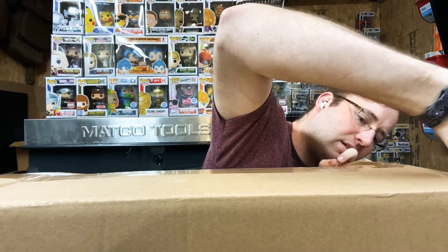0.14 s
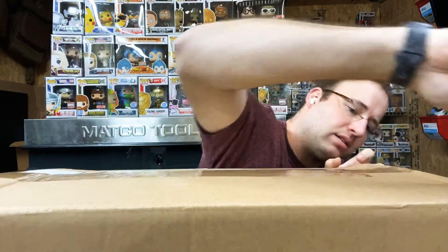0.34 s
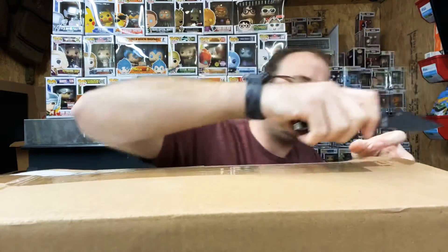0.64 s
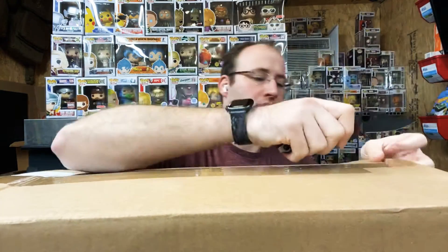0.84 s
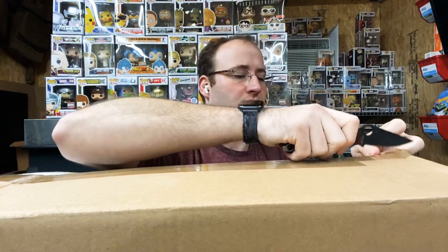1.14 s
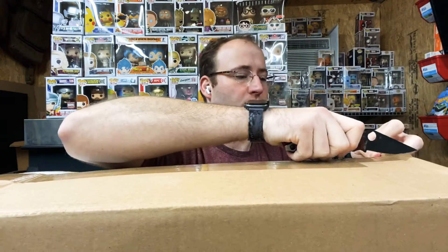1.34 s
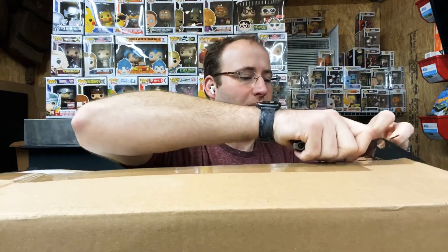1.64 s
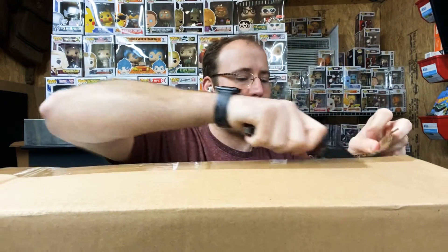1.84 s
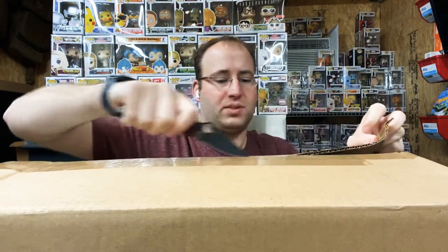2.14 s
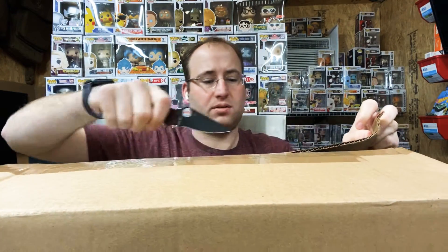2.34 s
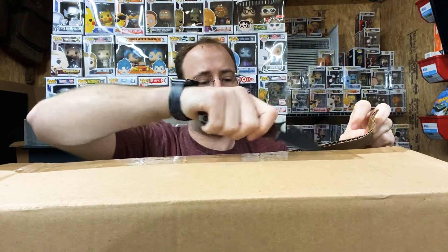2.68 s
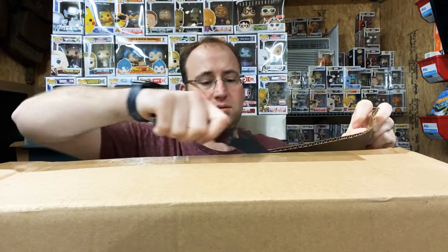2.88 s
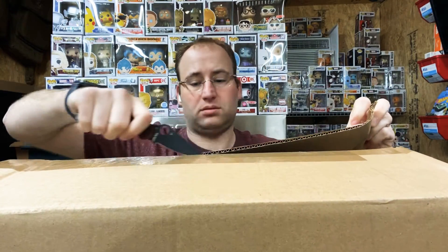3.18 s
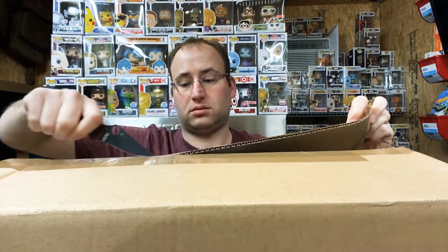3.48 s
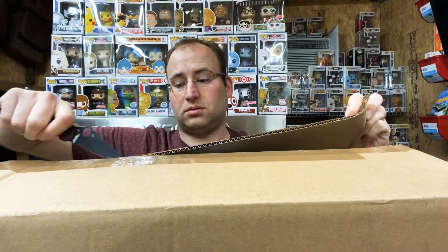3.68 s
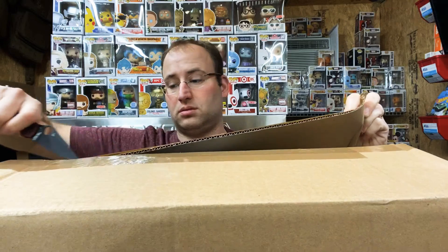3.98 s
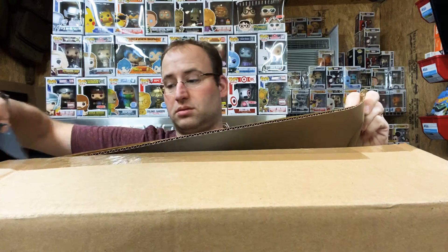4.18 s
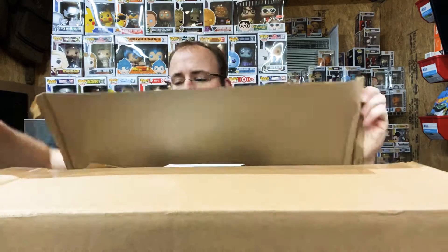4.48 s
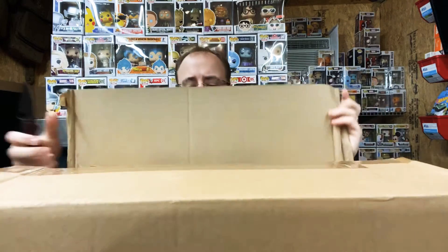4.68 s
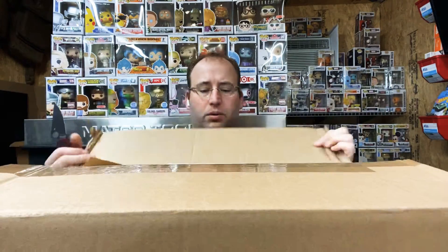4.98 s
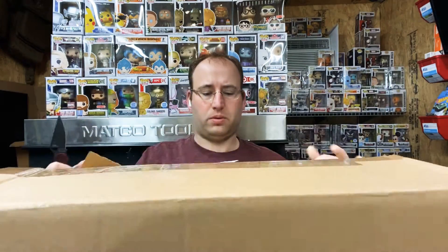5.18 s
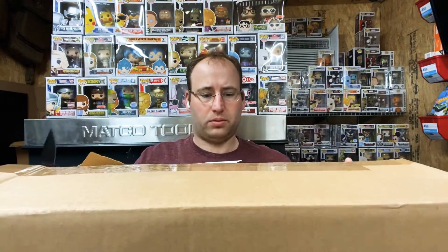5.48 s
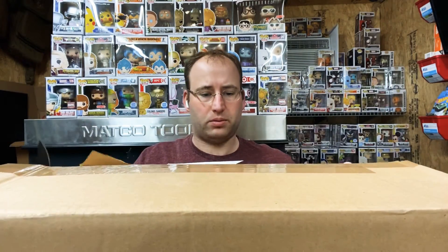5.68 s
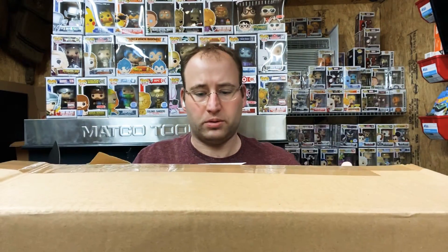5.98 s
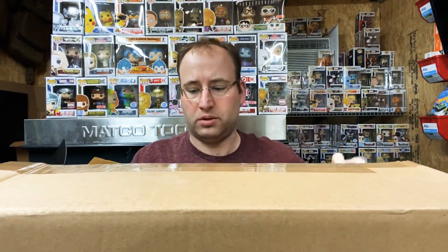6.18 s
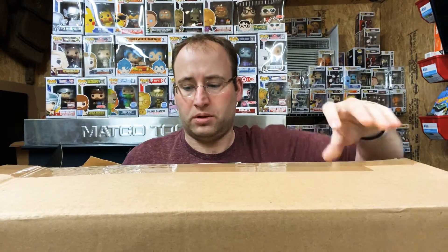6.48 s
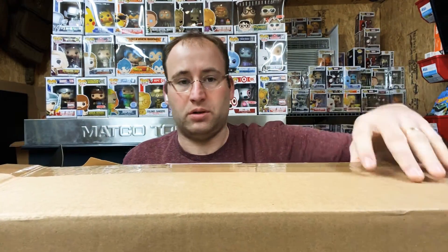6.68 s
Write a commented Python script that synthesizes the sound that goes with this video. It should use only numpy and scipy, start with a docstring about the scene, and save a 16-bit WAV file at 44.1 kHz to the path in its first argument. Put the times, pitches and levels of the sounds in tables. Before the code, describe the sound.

A taped cardboard box is cut open in a quiet room with a short echo. Early snaps and faint rubbing lead to one explosive tape pop, followed by gritty blade strokes with low boxy resonance, a stuttering catch and scattered fibre snaps. The last tape tears abruptly; afterwards come flap scuffs, tiny squeaks, soft bumps and sliding hands, captured close up.

```python
"""Cutting open a taped box

A knife opens a taped cardboard box close to the microphone, in a small cluttered room.
Tape pops and snaps are noise bursts, and the blade's strokes are grains of tiny fractures in three bands.
The blade also judders, and the last tape rips in a steep swell. Bumps and knocks ring the box panel.
A flap folds back with rubbing noise and rising squeaks; hands slide over the cardboard.
A short room echo and quiet air lie around it all."""
import sys
import numpy as np
from scipy import signal
from scipy.fft import rfft, irfft, next_fast_len
from scipy.io import wavfile
from scipy.ndimage import uniform_filter1d, map_coordinates

SR = 44100
rng = np.random.default_rng(int(sys.argv[2]) if len(sys.argv) > 2 else 0)


def transcribe(u):
    """Save the signal u as a 16-bit wav file named by the first command-line argument.

    u: samples, shape (n,) or (channels, n), limited to [-1, 1]; the rate is SR.
    q: integer samples, one column per channel.
    """
    v = np.clip(np.atleast_2d(u).T, -1, 1)
    q = np.round(v * 32767).astype(np.int16)
    wavfile.write(sys.argv[1], SR, q)


N = 301070
T = np.arange(N) / SR  # time in seconds
SHORT = T[:SR // 4]  # time within one hit

# Three strokes of the blade along the seam, one list of rows each, before the band gains below.
# Each row: time in seconds, hiss level in dB, rasp level in dB, box drone level in dB.
BLADE_STROKES = [
    [(1.7, -56, -79, -58), (1.716, -43.5, -48, -41.5), (1.754, -44, -65, -44.5), (1.828, -51, -70, -59.5),
     (1.946, -41.5, -49.5, -71), (2.038, -45, -63.5, -56.5), (2.068, -54.5, -61, -61),
     (2.085, -72, -76, -51)],
    [(2.67, -53, -78, -95), (2.69, -50, -74, -50.5), (2.716, -55, -60.5, -58.5), (2.804, -46, -51.5, -45.5),
     (2.942, -56, -54.5, -76), (3.21, -49, -53, -70), (3.342, -56, -68.5, -83.5), (3.5, -49, -70, -71),
     (3.53, -57, -75, -53)],
    [(3.55, -62, -64, -73), (3.562, -53.5, -54, -69), (3.698, -54.5, -72, -73), (3.75, -51, -53.5, -76),
     (3.78, -57, -71, -68), (3.87, -50.5, -50.5, -58), (4.02, -48.5, -47.5, -46), (4.162, -49, -44, -46.5),
     (4.235, -36.5, -35, -45.5)],
]
# Tape and fibres snapping. Each row: start in seconds, strength in dB.
FIBRE_SNAPS = [(0.0786, -17.5), (0.087, -20.5), (0.819, -33), (0.9869, -41.5), (1.713, -26), (2.276, -49),
               (3.047, -36.5), (3.4228, -33.5), (3.502, -35), (3.652, -36.5), (3.701, -37), (3.822, -35),
               (3.951, -27), (4.009, -23), (4.031, -22.5), (4.1848, -25), (4.7503, -31), (5.5652, -32),
               (6.228, -35), (6.739, -35.5)]
# The taut tape bursting. Each row: start in seconds, strength in dB, time to fade by 60 dB in seconds.
TAPE_POPS = [(1.478, -37.5, 0.02), (1.4861, -4.5, 0.045), (1.493, -12.5, 0.035), (4.2585, -21.5, 0.015)]
# Knocks on the hollow box. Each row: start in seconds, peak of the thump in dB, pitch of the panel in Hz.
BOX_KNOCKS = [(0.086, -24, 394), (0.092, -29, 207), (1.486, -13.5, 195.3), (1.596, -30, 215),
              (2.609, -47.5, 219), (3.518, -45, 198), (3.566, -36.5, 213), (3.822, -41, 198),
              (3.955, -31.5, 213), (4.010, -25, 195), (4.256, -18, 214.6), (4.696, -48, 208.4),
              (4.888, -36.5, 186), (4.935, -43.5, 218), (5.99, -40, 272), (6.232, -40.5, 182),
              (6.357, -56.5, 199), (6.529, -48, 212), (6.737, -36.5, 232)]
# Ways a box panel can ring. Each row: multiple of its pitch, relative level in dB, time to fade by 60 dB in seconds.
PANEL_MODES = [(0.798, -5, 0.054), (0.998, 1.5, 0.067), (1.221, -1.5, 0.045), (1.6, -5.5, 0.057),
               (2.148, -17, 0.031), (3.048, -15.5, 0.043)]
# An edge catches and sets one resonance of the board going.
# Each row: middle in seconds, half length in seconds, resonance in Hz, its width in Hz, level in dB.
EDGE_SCRAPES = [(0.085, 0.0066, 744, 496, -35.5), (0.158, 0.038, 4430, 428, -51.5),
                (0.481, 0.057, 2880, 610, -50), (0.996, 0.0042, 567, 251, -55),
                (1.605, 0.0052, 476, 393, -42.5), (1.923, 0.048, 1330, 345, -59),
                (2.772, 0.039, 620, 370, -55.5), (3.568, 0.011, 2600, 1170, -46.5),
                (4.901, 0.031, 827, 407, -50), (5.299, 0.018, 1540, 1770, -41.5)]
# The flap folded back along its neighbours. Each row: time in seconds, hiss level in dB, rasp level in dB.
FLAP_FOLD = [(4.66, -74, -69), (4.762, -46.5, -54.5), (4.85, -61, -61.5), (4.882, -35, -45.5),
             (4.938, -57, -59.5), (5.066, -45, -58), (5.114, -36.5, -43), (5.17, -53.5, -51.5),
             (5.256, -54.5, -58), (5.28, -47.5, -45.5), (5.352, -54, -55.5), (5.392, -43, -54),
             (5.45, -63, -56.5), (5.48, -84, -81)]
# Hands sliding over cardboard.
# Each row: start in seconds, length in seconds, hiss level in dB, rasp in dB against the hiss.
HAND_RUBS = [(0.451, 0.074, -49.5, -1.5), (0.556, 0.33, -64.5, -3), (1.621, 0.042, -60, -9),
             (4.441, .18, -72, 1.5), (5.667, 0.065, -48, 4.5), (5.803, 0.041, -57.5, 4),
             (6.146, 0.019, -64.5, 7), (6.585, 0.042, -55, -5), (6.74, 0.061, -58.5, -1)]
# The crease of the flap squeaking as it is bent back.
# Each row: start in seconds, length in seconds, pitch at the start in Hz, level in dB.
CREASE_SQUEAKS = [(5.011, .15, 1009, -56.5), (5.244, 0.068, 1063, -53)]
# Tone of tape fibres breaking. Each row: frequency in Hz, relative level in dB per Hz.
TAPE_TONE = [(1700, -24), (2450, -15), (2950, 0), (3500, -5), (4150, -1), (4800, -6), (5600, -1), (6100, 0),
             (6800, 3), (8000, -10)]
# Tone of rubbed board. Each row: frequency in Hz, relative level in dB per Hz.
BOARD_TONE = [(400, -21.5), (680, -15.5), (1200, -24.5), (3000, -5), (3600, -5), (4500, 1.5), (5500, 2),
              (6900, 9.5), (8000, -7.5)]
# Tone of the hollow box droning. Each row: frequency in Hz, relative level in dB per Hz.
HOLLOW_TONE = [(80, -29), (140, -3.5), (200, 6.5), (450, -13), (740, -16), (1200, -28.5), (3000, -48)]
# Tone of a pop's crackle. Each row: frequency in Hz, relative level in dB per Hz.
BURST_TONE = [(70, -21.5), (200, -9.5), (620, 4), (900, 1), (1400, 2.5), (1650, -2), (2050, -2), (3200, 2),
              (4400, -4.5), (5700, -0.5), (8000, -15.5)]
# Tone of tearing, crunching and scuffing. Each row: frequency in Hz, relative level in dB per Hz.
TEAR_TONE = [(70, -16.5), (230, 4.5), (500, 8.5), (900, 4.5), (1600, -7), (2900, 3), (5000, 1.5),
             (6600, 8.5), (8000, -9)]
# Tone of the room's air. Each row: frequency in Hz, relative level in dB per Hz.
AIR_TONE = [(80, -35.5), (170, -8.5), (2100, -15), (8000, -25)]

HISS_DB, RASP_DB, DRONE_DB = 0, -1.5, 0  # gains of the three cutting bands
# the last stretch of tape tearing free: a steep crescendo, a short hold, a fall
RIP_S, RIP_HOLD_S, RIP_DB = 4.247, 0.006, -21
RIP_RISE_DB_PER_S, RIP_FALL_DB_PER_S = 898, 682.5
SNAP_T60, LONGER_PER_DB = 0.032, 0.1251  # s for a snap of -28.5 dB; harder ones spray for longer
SNAP_ATTACK_S, SCUFF_ATTACK_S = .002, 0.0036  # fibres give way over a few milliseconds
# the blade sticking and slipping in the board, with one hard slip (the jolt) along the way
JUDDER_S, JUDDER_LENGTH_S, JUDDER_DB = 2.09, .085, -33.5
JUDDER_SAG_DB_PER_S, JOLT_S, JOLT_DB = 152, 2.139, -25
SLIP_HZ, JUDDER_PANEL_HZ = 99, 205.5  # slips a second; pitch of the panel they nudge
# the scuff of a knock against its thump; its decay in seconds; its highest level
SCUFF_DB, SCUFF_T60, SCUFF_MAX_DB = -10.5, 0.087, -45.5
RUB_RISE_DB_PER_S, RUB_FALL_DB_PER_S = 450, 351
SQUEAK_RISE_HZ_PER_S, SQUEAK_WIDTH_HZ = 900, 170
ROOM_T60, ROOM_DB = 0.13, -12.5  # echo decay in seconds; echo level against the direct sound
AIR_DB = -69
TOP_HZ = 7600  # band limit of the microphone


def cutting():
    """The blade breaks tape fibre by fibre, catching unevenly; the same grain drives the box."""
    band_gains = amp([[HISS_DB], [RASP_DB], [DRONE_DB]])
    hiss, rasp, drone = sum(gains(rows) for rows in BLADE_STROKES) * band_gains
    grain = fibres(rate=1100, spread_db=5.5, smooth=.35)
    catching = unit(amp(2.12 * wobble(62)))
    blade = friction(hiss, rasp, shifting(coloured(grain, TAPE_TONE)))
    box_drone = drone * coloured(grain, HOLLOW_TONE)
    return catching * (blade + box_drone)


def rip():
    """The last of the tape tears in a dense grain of breaks that swells steeply and falls away."""
    pull = held(RIP_S, RIP_HOLD_S, RIP_RISE_DB_PER_S, RIP_FALL_DB_PER_S)
    tearing = coloured(fibres(rate=4500, spread_db=1.5, smooth=1.0), TEAR_TONE)
    return amp(RIP_DB) * pull * tearing


def snaps():
    """A snap is a tick and a short spray of breaking fibres; harder ones crunch the board more."""
    spray, crunch = np.zeros((2, N))
    for s, db in FIBRE_SNAPS:
        t60 = SNAP_T60 * np.exp(LONGER_PER_DB * (db + 28.5))
        tick_and_spray = fade(0.0091) + fade(t60)
        burst = amp(db - 6) * tick_and_spray * attack(SNAP_ATTACK_S)
        add(spray, s, burst)
        add(crunch, s, burst * amp(0.24 * db - 1.5))
    return spray * coloured(noise(), TAPE_TONE) + crunch * coloured(noise(), TEAR_TONE)


def pops():
    """Taut tape gives way: one pressure pulse, then a broad crackling decay."""
    out = np.zeros(N)
    u = SHORT / .00022  # the pulse lasts a fraction of a millisecond
    pulse = (u - 1) * np.exp(-u)
    for s, db, t60 in TAPE_POPS:
        decay = fade(t60) + .08 * fade(0.075)
        crackle = coloured(noise(len(SHORT)), BURST_TONE) * decay
        add(out, s, amp(db) * (2.4 * pulse + .62 * crackle))
    return out


def judder():
    """Each slip of the stuck blade nudges the panel; the soft board passes no treble."""
    out = np.zeros(N)
    ring = panel(JUDDER_PANEL_HZ)
    for age in np.arange(0, JUDDER_LENGTH_S, 1 / SLIP_HZ):
        slip_db = JUDDER_DB - JUDDER_SAG_DB_PER_S * age + rng.normal()
        add(out, JUDDER_S + age, amp(slip_db) * ring)
    add(out, JOLT_S, amp(JOLT_DB) * ring)
    return filtered(out, lambda hz: 1 / (1 + (hz / 400) ** 6))


def knocks():
    """Blade and hands bump the box: the panel thumps and its surface scuffs."""
    thumps, scuff = np.zeros((2, N))
    for s, db, pitch_hz in BOX_KNOCKS:
        add(thumps, s, amp(db) * panel(pitch_hz))
        scuff_db = min(db + SCUFF_DB, SCUFF_MAX_DB)
        add(scuff, s, amp(scuff_db) * fade(SCUFF_T60) * attack(SCUFF_ATTACK_S))
    return thumps + scuff * coloured(noise(), TEAR_TONE)


def panel(pitch_hz):
    """The ring of a box panel after one blow, peak 1; it is too small to radiate deep bass."""
    ring = np.zeros(len(SHORT))
    for ratio, db, t60 in PANEL_MODES:
        ring += amp(db) * fade(t60) * np.sin(2 * np.pi * ratio * pitch_hz * SHORT)
    no_bass = signal.butter(4, 138, "high", fs=SR, output="sos")
    ring = signal.sosfilt(no_bass, ring * attack(.0015))
    return ring / np.abs(ring).max()


def scrapes():
    """Short swells of friction, each ringing in one resonance."""
    out = np.zeros(N)
    for s, half, centre_hz, width_hz, db in EDGE_SCRAPES:
        def resonance(hz):
            return 1 / (1 + ((hz ** 2 - centre_hz ** 2) / (hz * width_hz + 1)) ** 2)
        swell = np.exp(-((T - s) / half) ** 2)
        out += amp(db) * unit(filtered(noise(), resonance)) * swell
    return out


def rubbing():
    """Flap and hands swell and fade, with a finer grain than the cut and a faint drone from the box."""
    hiss, rasp = gains(FLAP_FOLD)
    for s, length, db, rasp_db in HAND_RUBS:
        swell = amp(db) * held(s, length, RUB_RISE_DB_PER_S, RUB_FALL_DB_PER_S)
        hiss = hiss + swell
        rasp = rasp + swell * amp(rasp_db)
    grain = fibres(rate=2000, spread_db=4, smooth=.65)
    surface = friction(hiss, rasp, shifting(coloured(grain, BOARD_TONE)))
    return surface + amp(-31) * hiss * coloured(grain, HOLLOW_TONE)


def squeak():
    """A narrow, unsteady band of friction in the crease glides upward."""
    # slow noise times a tone makes a band of noise around the tone's pitch
    flutter = unit(filtered(noise(), lambda hz: 1 / (1 + (2 * hz / SQUEAK_WIDTH_HZ) ** 2)))
    out = np.zeros(N)
    for s, length, start_hz, db in CREASE_SQUEAKS:
        pitch = start_hz + SQUEAK_RISE_HZ_PER_S * (T - s)
        tone = np.sin(2 * np.pi * np.cumsum(pitch) / SR)
        bend = held(s, length, rise_db_per_s=400, fall_db_per_s=600)
        out += amp(db) * bend * unit(flutter * tone)
    return out


def fibres(rate, spread_db, smooth):
    """Tiny fractures of very unequal size, rate a second at random, over a share of smooth rubbing."""
    moments = rng.random(N) < rate / SR
    sizes = amp(spread_db * np.clip(noise(), -2, 2))
    breaks = moments * rng.choice([-1, 1], N) * sizes
    return unit(unit(breaks) + smooth * noise())


def friction(hiss, rasp, sound):
    """Splits rubbing near 4.9 kHz, so hiss above and rasp below can follow their own levels."""
    lower = filtered(sound, lambda hz: 1 / (1 + (hz / 4900) ** 10))
    return hiss * unit(sound - lower) + rasp * unit(lower)


def shifting(x):
    """As the contact point travels, resonances of the sheet come and go."""
    hz, t, z = signal.stft(x, SR, nperseg=512)
    knots = rng.standard_normal(z.shape)
    # a smooth random level map, with one knot every 400 Hz and 26 ms
    places = np.meshgrid(hz / 400, t / .026, indexing="ij")
    field = amp(4.8 * map_coordinates(knots, places))
    return unit(signal.istft(z * field)[1][:N])


def room(x):
    """Crowded shelves give a short, diffuse answer, made from fading noise after a 5 ms gap."""
    tail = noise(len(SHORT)) * fade(ROOM_T60) * (SHORT > .005)
    return signal.fftconvolve(x, tail / np.linalg.norm(tail))[:N]


def quiet_air():
    """The room's air is steady, soft noise."""
    return amp(AIR_DB) * coloured(noise(), AIR_TONE)


def amp(db):
    """Decibels to gain."""
    return 10 ** (np.asarray(db) / 20)


def noise(length=N):
    """White noise."""
    return rng.standard_normal(length)


def fade(t60):
    """A decay that loses 60 dB in t60 seconds."""
    return amp(-60 * SHORT / t60)


def attack(seconds):
    """A soft start that approaches 1 at the given pace."""
    return 1 - np.exp(-SHORT / seconds)


def held(start, length, rise_db_per_s, fall_db_per_s):
    """A gain that rises to 1 at start, holds for length and falls away."""
    rise = rise_db_per_s * (T - start)
    fall = fall_db_per_s * (start + length - T)
    return amp(np.minimum(0, np.minimum(rise, fall)))


def gains(rows):
    """Each dB column as a gain per sample, silent outside the rows."""
    s, *columns = np.transpose(rows)
    gate = uniform_filter1d(((T >= s[0]) & (T <= s[-1])) * 1., size=300)  # softened edges
    return np.array([gate * amp(np.interp(T, s, c)) for c in columns])


def wobble(rate):
    """A smooth random curve, rate knots a second."""
    return map_coordinates(noise(int(N * rate / SR) + 4), [T * rate])


def unit(x):
    """Scale to an average (rms) level of 1."""
    return x / np.sqrt(np.mean(x ** 2) + 1e-20)


def along(points, hz):
    """Values between (Hz, value) points, read on a log frequency axis."""
    f, v = np.transpose(points)
    return np.interp(np.log(hz + 1), np.log(f), v)


def filtered(x, response):
    """x with each frequency scaled by the response."""
    size = next_fast_len(len(x) + 8192)
    hz = np.fft.rfftfreq(size, 1 / SR)
    return irfft(rfft(x, size) * response(hz), size)[:len(x)]


def coloured(x, spectrum):
    """x filtered to a tone table, at rms 1."""
    return unit(filtered(x, lambda hz: amp(along(spectrum, hz))))


def add(track, s, sound):
    """Mix a sound into the track from time s."""
    start = max(0, round(s * SR))
    track[start:start + len(sound)] += sound[:max(0, N - start)]


def scene():
    """Knife, flaps and box over the quiet air of the room."""
    knife = cutting() + rip() + snaps() + pops() + judder()
    box = knife + knocks() + scrapes() + rubbing() + squeak()
    return (box + amp(ROOM_DB) * room(box) + quiet_air())[None]


def record(dry):
    """The microphone clips peaks beyond 0.9 and passes nothing much above its band limit."""
    clipped = np.clip(dry[0], -.9, .9)
    return filtered(clipped, lambda hz: 1 / np.sqrt(1 + (hz / TOP_HZ) ** 100))[None]


dry = scene()
out = record(dry)
transcribe(out)
```